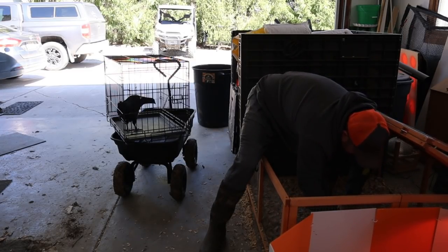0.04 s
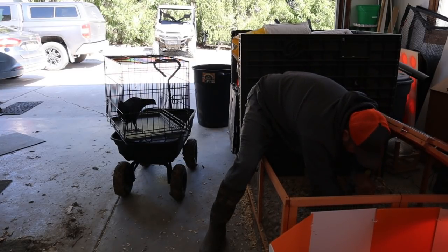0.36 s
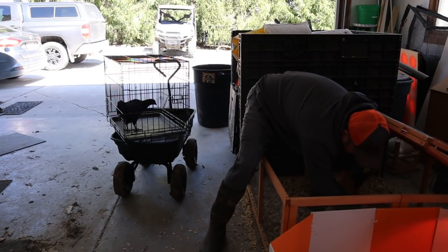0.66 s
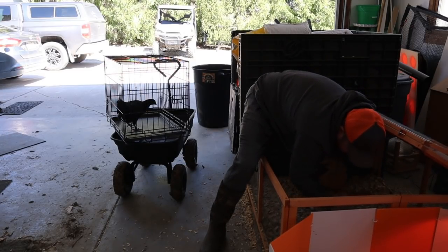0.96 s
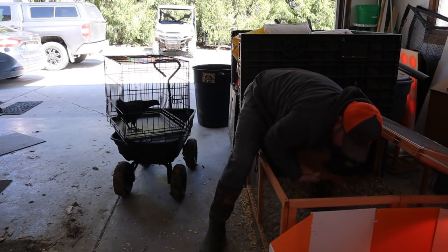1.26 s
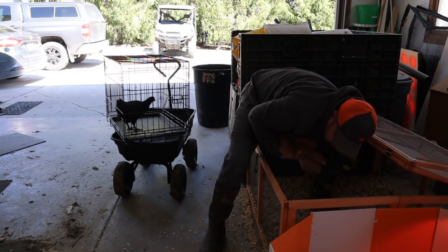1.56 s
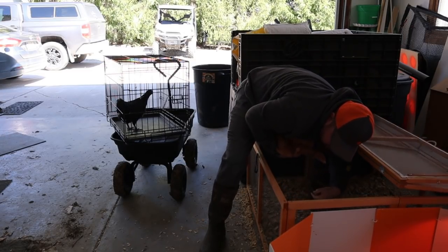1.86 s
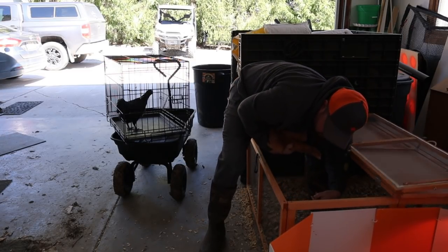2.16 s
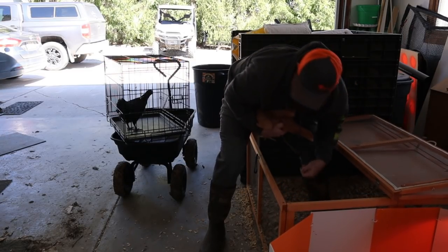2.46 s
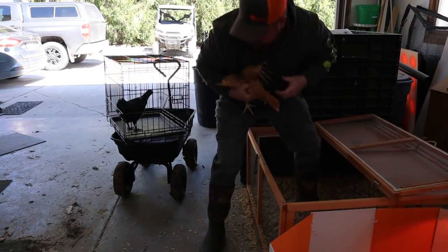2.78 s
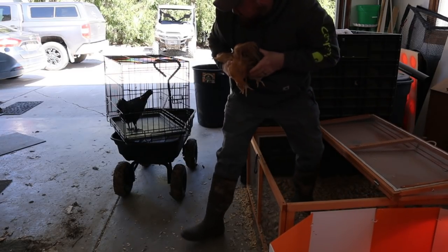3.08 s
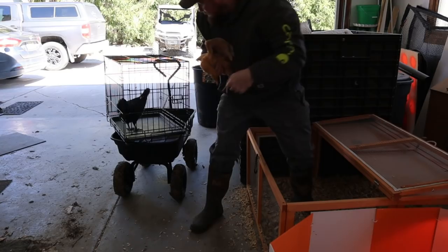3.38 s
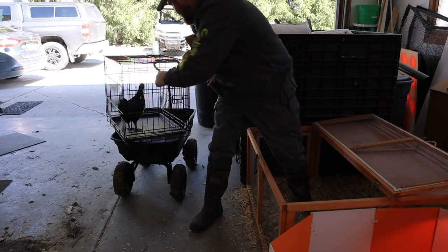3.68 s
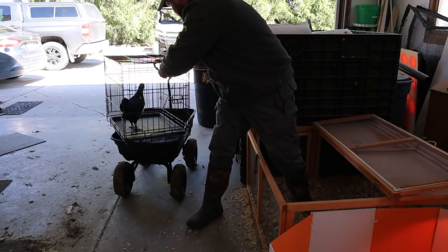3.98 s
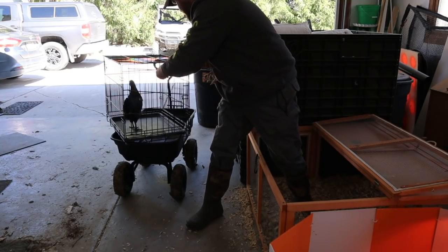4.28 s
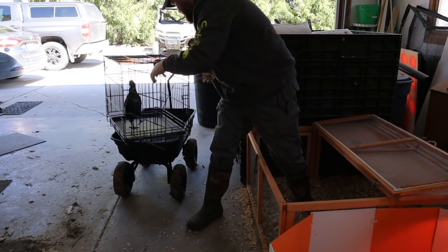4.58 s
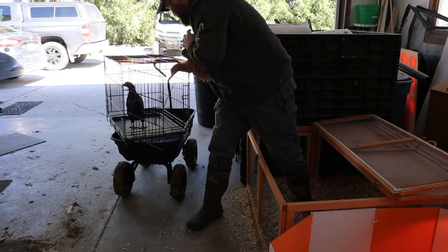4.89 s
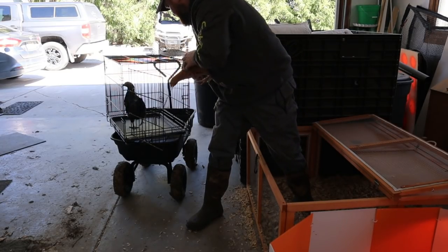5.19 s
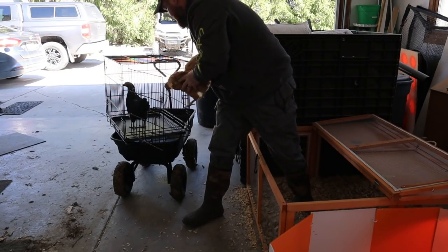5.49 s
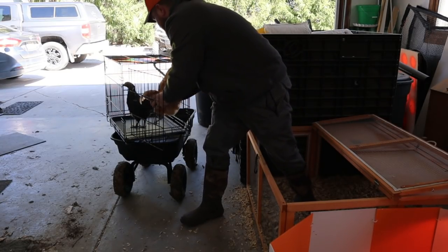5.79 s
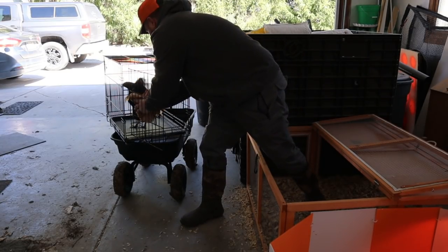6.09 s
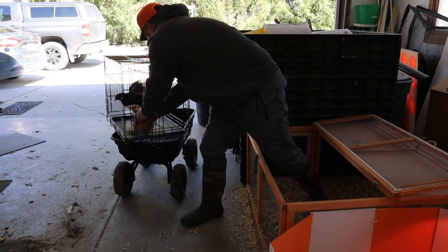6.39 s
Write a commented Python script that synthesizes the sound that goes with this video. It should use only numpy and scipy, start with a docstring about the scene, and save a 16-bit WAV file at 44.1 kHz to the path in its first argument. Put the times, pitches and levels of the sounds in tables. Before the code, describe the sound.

A young chicken squawks from the start, in a quick run of short calls that crack between a thin high note, a fuller note an octave lower and a rasp. Boots scuff around 2 seconds, and at about 2.3 seconds a wooden hutch lid falls open with a thump and a brief rattle. More squawks, some opening on a squeak, follow from 2.6 to 3.7 seconds, with rustling clothes and straw and a couple of dull boot bumps. Cage wires tick lightly between 3.3 and 4.6 seconds, and another chick peeps faintly twice just after 4 seconds while the squawking pauses. The squawks return from 4.7 seconds to the end, with a short rustle near 5.3 seconds, then a scuff and two hoarse clucks just after 6 seconds. Everything has a short garage echo, over a faint, steady outdoor hush.

```python
"""A young chicken squawks again and again as it is lifted from a wooden hutch and put in a wire cage.
Its voice flips between a thin high note, a full note an octave lower (its voice box beats strong and
weak in turn) and a rasp (the beats lose their order). Other chicks peep and cluck.
The hutch lid falls open with a thump, boots scuff, clothes and bedding rustle and cage wires tick.
It all echoes in a garage whose door stands open to the hush of the yard."""
import sys
import numpy as np
from scipy import signal
from scipy.fft import rfft, irfft, next_fast_len
from scipy.io import wavfile

SR = 44100
rng = np.random.default_rng(int(sys.argv[2]) if len(sys.argv) > 2 else 0)


def log_audio(samples):
    """Write samples as a 16-bit WAV file to the path given in sys.argv[1]."""
    # one column per channel
    frames = np.atleast_2d(samples).T
    # limit to full scale, then quantise
    limited = np.clip(frames, -1, 1)
    pcm = np.round(limited * 32767).astype(np.int16)
    wavfile.write(sys.argv[1], SR, pcm)


N = 284445
TIME = np.arange(N) / SR


def amp(db):
    """Turns decibels into a number to multiply by."""
    return 10 ** (np.asarray(db) / 20)


def unit(x):
    """Scales a sound to an average (rms) size of 1."""
    return x / np.sqrt(np.mean(x ** 2) + 1e-20)


def read(points, hz):
    """Looks up a table's value at hz, with octaves evenly spaced."""
    freq_hz, value = np.transpose(points)
    return np.interp(np.log(hz + 1), np.log(freq_hz + 1), value)


def colour(x, spectrum):
    """Turns frequencies up or down by a table of freq_hz, level_db."""
    return irfft(rfft(x) * amp(read(spectrum, np.fft.rfftfreq(len(x), 1 / SR))), len(x))


def noise(spectrum):
    """Noise of size 1 with the given tone colour."""
    return unit(colour(rng.standard_normal(next_fast_len(N, True)), spectrum)[:N])


def wander(hz):
    """A smooth random wobble of size 1, mostly slower than hz."""
    return unit(signal.sosfilt(signal.butter(2, hz, fs=SR, output="sos"), rng.standard_normal(N)))


def treble(x, hz):
    """The part of x above hz."""
    return signal.sosfiltfilt(signal.butter(2, hz, "high", fs=SR, output="sos"), x)


def gate(t, length, attack, release):
    """Fades in, holds and fades out between t = 0 and length."""
    return np.sin(np.pi / 2 * np.clip(np.minimum(t / attack, (length - t) / release), 0, 1)) ** 2


def add(mix, start_s, sound):
    """Mixes a sound in at start_s."""
    part = mix[max(round(start_s * SR), 0):][:len(sound)]
    part += sound[:len(part)]


# Tone colour of the outdoor hush: freq_hz, level_db
YARD_COLOUR = [(21, -28), (35, -0.5), (97, 2), (826, 0), (1770, -8.5), (2290, -11.5), (4330, -28),
               (5450, -18.5), (11700, -38), (15500, -37)]
def yard(level_db=-54):
    """A steady low hush comes in through the open door."""
    return amp(level_db) * noise(YARD_COLOUR)


# How long the echo takes to fade by 60 dB: freq_hz, fade_s
ECHO_FADE = [(150, .7), (500, .57), (1400, .42), (3000, .45), (6000, .4), (14000, .28)]
def garage(x, echo_db, build_s=0.00078):
    """Adds dense echoes from hard walls and floor; the low ones last longest."""
    t = np.arange(SR) / SR
    echoes = rng.choice([-1., 1.], SR) * (rng.random(SR) < 4000 / SR) * (1 - np.exp(-t / build_s))
    hz, when, bands = signal.stft(echoes, SR, nperseg=256)
    tail = signal.istft(bands * amp(-60 * when / read(ECHO_FADE, hz)[:, None]), SR, nperseg=256)[1]
    return x + amp(echo_db) * signal.fftconvolve(x, tail / np.linalg.norm(tail))[:N]


# How loud the rubbing is as time passes: time_s, level_db
RUSTLE_LEVELS = [(0, -61), (2.1, -61.5), (2.65, -55.5), (2.95, -48.5), (3.2, -54), (3.34, -51),
                 (3.42, -64.5), (3.8, -65), (3.89, -53.5), (4.1, -65.5), (4.27, -58.5), (4.6, -68),
                 (5.15, -67), (5.35, -46), (5.55, -74)]
# Tone colour of the rubbing: freq_hz, level_db
CLOTH_COLOUR = [(300, -2), (1500, 7.5), (3500, 8.5), (7000, -2.5), (12000, -6), (15500, -12)]
def rustle(grain_db=2.5):
    """Cloth and straw rub in clumps of tiny slips."""
    level_db = np.interp(TIME, *np.transpose(RUSTLE_LEVELS))
    return amp(level_db) * unit(noise(CLOTH_COLOUR) * amp(grain_db * wander(150)))


# Scuffs of boots: start_s, level_db, decay_s
BOOT_SCUFFS = [(1.97, -35, 0.083), (2.261, -29.5, 0.044), (2.296, -31, 0.029), (3.062, -28, 0.01),
               (3.304, -30, 0.007), (6.215, -36, 0.12), (6.35, -63, 0.036)]
# Tone colour of a scuff: freq_hz, level_db
BOOT_COLOUR = [(60, -15), (140, -9), (250, -0.5), (650, -4), (1100, -7), (3000, -19.5), (12000, -50)]
def scuffs():
    """Boots bump and drag: dull bursts, and the longer ones start more softly."""
    force, t = np.zeros(N), np.arange(SR // 3) / SR
    for start_s, db, decay_s in BOOT_SCUFFS:
        add(force, start_s, amp(db) * np.exp(-t / decay_s) * np.minimum(t / (0.22 * decay_s), 1))
    return force * noise(BOOT_COLOUR)


# Ticks of the cage: start_s, strength_db
CAGE_TICKS = [(3.304, -49), (3.335, -33), (3.74, -43.5), (3.974, -36.5), (4.233, -39), (4.428, -39),
              (4.603, -43)]
# Notes a wire rings with, and their time to fade by 60 dB: pitch_hz, level_db, fade_s
WIRE_NOTES = [(2450, -12, 0.056), (3930, 1.5, 0.028), (5980, 0, 0.03), (7960, -17, 0.021),
              (12640, -14, 0.027)]
def cage(level_db=-8, detune=0.064):
    """Thin wires click and ring briefly, at slightly different pitches each time."""
    out, t = np.zeros(N), np.arange(SR // 8) / SR
    for start_s, strength_db in CAGE_TICKS:
        ring = np.zeros(len(t))
        for hz, db, fade_s in WIRE_NOTES:
            pitch_hz = hz * (1 + detune * rng.standard_normal())
            ring += amp(db - 60 * t / fade_s) * np.sin(2 * np.pi * pitch_hz * t)
        click = np.exp(-t / 0.00051) * rng.standard_normal(len(t))
        add(out, start_s, amp(strength_db + level_db) * (0.34 * ring + 1.26 * click))
    return out


# Blows on the hutch: start_s, strength_db, rattle_decay_s, treble_db
HUTCH_KNOCKS = [(2.325, -17, 0.018, -9), (2.351, -17, 0.0043, -5.5), (2.385, -34, 0.041, -3),
                (2.426, -30, 0.018, -15), (2.491, -28, 0.019, -1.5), (2.535, -36.5, 0.055, -7)]
# Notes the wooden frame rings with: pitch_hz, width_hz, level_db
WOOD_NOTES = [(164.5, 7.2, 20.7), (340.8, 39, 8.6), (373, 31.4, 9), (523, 9.4, 7.7), (582.4, 88, 13),
              (636, 83, 6.5), (940, 35, 2), (1196, 48, 17.6)]
# Tone colour of the crack of a blow: freq_hz, level_db
CRACK_COLOUR = [(70, -27), (115, -50), (165, -5), (400, -4.5), (1200, -1), (2500, -8.5), (5500, -19),
                (7500, -30), (15000, -54)]
def hutch(crack_db=-2, ring_db=-3, push=0.23, push_s=0.0027):
    """Each blow is a push and a short rattle of loose boards that rings the wooden frame."""
    force, bright = np.zeros((2, N))
    t = np.arange(SR // 3) / SR
    for start_s, db, decay_s, treble_db in HUTCH_KNOCKS:
        rattle = amp(db) * np.exp(-t / decay_s) * rng.standard_normal(len(t))
        add(force, start_s, rattle + amp(db) * push * gate(t, push_s, push_s / 2, push_s / 2))
        add(bright, start_s, rattle * amp(treble_db))
    ring = sum(amp(db) * signal.lfilter(*signal.iirpeak(hz, hz / width_hz, fs=SR), force)
               for hz, width_hz, db in WOOD_NOTES)
    ring -= treble(ring, 2100)  # soft wood has no high ring
    crack = colour(force + treble(bright - force, 890), CRACK_COLOUR)
    return np.std(force) * (amp(ring_db) * unit(ring) + amp(crack_db) * unit(crack))


def whistle(rows, overtone_db, jitter, rise, fall):
    """Unsteady sliding notes with weak overtones; rise and fall are shares of a note's length."""
    out, unsteady = np.zeros(N), 1 + jitter * wander(460)
    for start_s, length_s, from_hz, to_hz, db in rows:
        on = (TIME >= start_s) & (TIME < start_s + length_s)
        progress = (TIME[on] - start_s) / length_s
        phase = 2 * np.pi * np.cumsum((from_hz + (to_hz - from_hz) * progress) * unsteady[on]) / SR
        note = unit(sum(amp(overtone_db * k) * np.sin((k + 1) * phase) for k in range(3)))
        out[on] += amp(db) * gate(progress, 0.96, rise, fall) * note
    return out


# Peeps: start_s, length_s, from_hz, to_hz, level_db
CHICK_PEEPS = [(2.56, .056, 2188, 2020, -35.5), (4.108, 0.077, 2490, 2006, -49),
               (4.298, .1, 3170, 1960, -46)]
def peeps():
    """A chick farther off gives high, nearly pure, falling notes."""
    return whistle(CHICK_PEEPS, overtone_db=-29, jitter=0.013, rise=0.43, fall=0.24)


# Clucks: start_s, length_s, from_hz, to_hz, level_db
CHICK_CLUCKS = [(3.05, .026, 1302, 607.5, -36.5), (6.21, 0.0424, 920.5, 820, -26.5),
                (6.352, 0.0377, 852, 722, -29.5)]
def clucks():
    """Short, low, hollow notes, made hoarse by a shaky pitch and loudness."""
    notes = whistle(CHICK_CLUCKS, overtone_db=-10.5, jitter=0.118, rise=0.19, fall=0.23)
    return notes * (1 + 0.35 * wander(339))


# How the hutch colours the voice inside it: freq_hz, level_db
HUTCH_COLOUR = [(300, -2.5), (620, 1.5), (1200, -2), (2000, 2), (2700, 6.5), (3600, 2), (5500, 1.5),
                (9000, -1), (15000, 0.5)]
def lifted(voice, clear_s=3.18, lift_s=.5):
    """The hutch colours the voice until the bird is lifted clear."""
    inside = np.clip((clear_s - TIME) / lift_s, 0, 1)
    return colour(voice * inside, HUTCH_COLOUR) + voice * (1 - inside)


def carried(voice, echo_db, cycle_s=1.96):
    """The bird is moved about, so its voice drifts between three patterns of echoes."""
    place = 2 * np.pi * TIME / cycle_s
    return sum(garage(voice * (1 + np.cos(place + 2 * np.pi * k / 3)) / 3, echo_db) for k in range(3))


# Squeaks of the held bird: start_s, from_hz, to_hz, level_db
OPENING_SQUEAKS = [(2.186, 2704, 2450, -51.5), (2.604, 3000, 2635, -46), (2.931, 2265, 2955, -41),
                   (3.195, 2721, 2218, -38.5), (3.616, 2968, 2336, -43), (4.71, 2650, 1700, -43),
                   (6.05, 1397, 2000, -26)]
def squeaks(length_s=0.0202, overtone_db=-19, jitter=0.067):
    """The young voice cracks: some calls start on an unsteady squeak."""
    out, t = np.zeros(N), np.arange(0, length_s, 1 / SR)
    unsteady = 1 + jitter * wander(400)
    for start_s, from_hz, to_hz, db in OPENING_SQUEAKS:
        hz = np.geomspace(from_hz, to_hz, len(t)) * unsteady[TIME >= start_s][:len(t)]
        phase = 2 * np.pi * np.cumsum(hz) / SR
        note = np.sin(phase) + amp(overtone_db) * np.sin(2 * phase)
        add(out, start_s, amp(db) * note * signal.windows.tukey(len(t), .5))
    return out


# Calls of the held bird on its high note; a share runs from 0 to 1, and an open beak adds treble:
# start_s, length_s, effort_db, swell_db, pitch_hz, glide_hz, rasp_share, beak_treble_db
HIGH_CALLS = [(-.015, 0.061, -34, -4, 1400, -24.5, 0.66, -2.5), (.069, 0.078, -33, -2, 1403, -39, 0.67, -7),
              (.287, .176, -32, -1, 1387, -49, 0.86, 1), (.519, 0.067, -31, -1, 1444, 44, 0.38, 3.5),
              (.612, .045, -30, 3, 1473, -14, 0.24, -32), (.717, 0.1, -27, 3.5, 1429, 37.5, 0.09, -2.5),
              (.955, 0.16, -27, -1.5, 1385, 15.5, 0.42, -4.5),
              (1.25, .195, -30, -0.5, 1372, -150, 0.61, -2), (1.53, .13, -31, -6.5, 1318, -0.5, .25, 0.5),
              (1.795, 0.1, -29.5, -0.5, 1297, -20, 0.38, -1), (2.195, 0.067, -37, 2.5, 1457, -19, 0.83, -3),
              (2.602, .213, -30, 8, 1325, -70, 0.25, -2.5), (2.939, 0.12, -29.5, -1, 1330, -83, 0.73, 0),
              (3.201, 0.061, -29.5, -4, 1471, -260, .8, -2.5),
              (3.25, 0.052, -31, 5, 1371, -320, 0.69, -1.5), (3.624, .074, -29, 0, 1451, -330, 0.64, -2.5),
              (4.717, .085, -30.5, 2, 1376, -130, 0.84, -3.5), (4.79, .16, -32, 4, 1329, -17, 0.66, -4),
              (5.203, 0.26, -27, -0.5, 1335, -110, 0.39, -6.5),
              (5.516, 0.13, -29.5, -2, 1353, -11, 0.74, 0.5), (5.773, 0.095, -29, 2.5, 1326, -100, 0.6, -6),
              (6.028, .18, -33, 1, 1408, -150, 0.61, -7), (6.32, 0.098, -32, -3.5, 1342, -39.5, .5, -2)]
def high_calls(fade_s=0.017, scoop=.11, scoop_s=.01, catch_s=.012, clearing=0.57):
    """Curves that steer the voice: each call slides up to pitch; its rasp catches, then eases."""
    hz = np.full(N, np.mean(HIGH_CALLS, axis=0)[4])
    effort, rasp, beak_db = np.zeros((3, N))
    quaver = .03 * wander(39.52)  # the raspier the call, the more this shakes its pitch
    for start_s, length_s, db, swell_db, pitch_hz, glide_hz, rough, treble_db in HIGH_CALLS:
        on = (TIME >= start_s) & (TIME < start_s + length_s)
        t = TIME[on] - start_s
        from_middle = t / length_s - .5
        effort[on] += amp(db + swell_db * from_middle) * gate(t, length_s, fade_s, fade_s)
        slide_up = 1 - scoop * np.exp(-t / scoop_s)
        hz[on] = (pitch_hz + glide_hz * from_middle) * slide_up * (1 + rough * quaver[on])
        rasp[on] = rough * (1 - clearing * from_middle) * (1 - np.exp(-t / catch_s))
        beak_db[on] = treble_db
    return hz, effort, rasp, beak_db


# Breaks, where a call drops to the full note an octave lower: start_s, length_s, pitch_hz,
# arch_hz, glide_hz, low_note_share, rasp_share, extra_effort_db, beak_treble_db
VOICE_BREAKS = [(.305, .07, 581.5, 9, -10, 0.85, 0.19, 4.5, 3.5),
                (.732, .035, 687, 0, 4, 0.74, 0.62, 0, -2.5),
                (.973, 0.12, 637.4, 20, -17, 0.89, 0.15, -2.5, 6.5),
                (1.277, .132, 617, -35.5, 50.5, 0.93, .24, -1.5, 6.5),
                (1.564, 0.043, 637, 1.5, -14, 0.8, 0.86, 0, 2.5),
                (1.833, 0.044, 651, 1.5, -2, 0.81, 0.79, 0, -3.5),
                (2.679, 0.032, 661.6, 0, -2, 0.47, 0.42, -3, 2.5),
                (2.95, 0.097, 584.2, 10.5, -51, 0.71, 0.62, 3, -7),
                (4.871, 0.028, 654.6, 1, 3, .5, 0.7, 3.5, -5),
                (5.228, .042, 622.7, -0.5, 7, 0.64, .8, -1.5, -3.5),
                (5.336, 0.11, 586.6, 23.5, 27, 0.71, .24, -1.5, 3.5),
                (5.533, 0.078, 626.6, 98, -3, 0.76, 0.27, 0, 6.5),
                (5.793, .04, 599, 1, -2, 0.69, 0.6, -1.5, 2.5),
                (6.069, 0.15, 628.6, 8.5, -20, 0.68, 0.6, 0.5, 2)]
def voice_breaks(hz, effort, rasp, beak_db, flip_s=.008, stumble_s=0.0097, beak_db_per_hz=0.1366):
    """Bends the curves at each break: the low note comes in and the beak opens as its pitch rises."""
    in_break, low_note = np.zeros((2, N))
    for start_s, length_s, pitch_hz, arch_hz, glide_hz, depth, rough, push_db, treble_db in VOICE_BREAKS:
        on = (TIME >= start_s) & (TIME < start_s + length_s)
        t = TIME[on] - start_s
        blend = gate(t, length_s, flip_s, flip_s)
        note_hz = pitch_hz + arch_hz * np.sin(np.pi * t / length_s) + glide_hz * (t / length_s - .5)
        in_break[on], low_note[on] = blend, blend * depth
        hz[on] += blend * (2 * note_hz - hz[on])  # two beats make one cycle of the low note
        rasp[on] += blend * (rough - rasp[on])
        beak_db[on] += blend * (treble_db + beak_db_per_hz * (note_hz - note_hz.mean()) - beak_db[on])
        effort[on] *= amp(blend * push_db)
        # the voice rasps going into a break and coming out of it
        for edge_s, amount in (start_s, 0.37), (start_s + length_s, 0.63):
            rasp += amount * (1 - rasp) * np.exp(-((TIME - edge_s) / stumble_s) ** 2)
    low_note += (1 - in_break) * 0.51 * rasp  # a rasp lets some low note into the high one
    return hz, effort, rasp, beak_db, low_note


# Tone colour of the throat on a clear note: freq_hz, level_db
THROAT_COLOUR = [(350, -17), (620, 10), (900, -0.5), (1350, 8.5), (1800, 11), (2300, -6.5), (2750, -8),
                 (3500, -3), (4400, -14), (5600, -20), (7000, -29.5), (9000, -30), (11000, -32),
                 (15500, -63)]
# Tone colour of the throat on a rasp: freq_hz, level_db
RASP_COLOUR = [(200, -16.5), (400, -14.5), (600, -9), (900, -19), (1350, 2), (1900, 7), (2500, 0.5),
               (3200, -9.5), (5400, -11), (7000, -24.5), (9000, -23.5), (15500, -39.5)]
def squawks(jitter=0.02, waver=0.0152, shimmer=0.27, slip_hz=170, stumble_hz=135, beak_hz=2600):
    """The voice box beats at the high pitch; uneven beats drop it an octave; pushed on, it rasps."""
    hz, effort, rasp, beak_db, low_note = voice_breaks(*high_calls())
    on = effort > 0
    low_note, rasp = np.clip(low_note[on], 0, 1), np.clip(rasp, 0, .9)
    brightness = amp(beak_db + 3) * np.sqrt(np.minimum(effort / amp(-25.5), 1))  # duller when quiet
    unsteady = 1 + jitter * rasp * wander(340) + waver * np.sqrt(rasp) * wander(73.5)
    cycles = np.cumsum(hz / 2 * unsteady) / SR
    # in a rasp the strong and weak beats lose their order, blurring the low note; the high one stumbles
    slip = np.cumsum(slip_hz * rasp ** 2 * wander(505)) / SR
    stumble = np.cumsum(stumble_hz * rasp ** 1.503 * wander(353)) / SR
    tone, power = np.zeros((2, N))
    for k in range(1, 26):  # even harmonics make the high note, odd ones add the low note
        harmonic_hz = k * hz[on] / 2
        share = low_note ** 3.6 if k == 1 else low_note if k % 2 else 1
        size = amp(read(THROAT_COLOUR, harmonic_hz)) * share
        size *= amp(2.5 * wander(27)[on])  # a struggling neck keeps shifting the tone colour
        beak_effect = 1 / (1 + (beak_hz / harmonic_hz) ** 8)
        lag = k ** 2 / 20  # the throat rings, which spreads each pulse over its cycle
        phase = 2 * np.pi * (k * cycles[on] + k % 2 * slip[on] + stumble[on] - lag)
        tone[on] += size * (1 + beak_effect * (brightness[on] - 1)) * np.cos(phase)
        power[on] += (size * (1 - beak_effect)) ** 2 / 2
    tone /= np.sqrt(power + 1e-9)
    airflow = 1 + 0.37 * np.cos(2 * np.pi * 2 * cycles)  # air escapes in one puff a beat
    puffs = unit(colour(rng.standard_normal(N) * airflow, RASP_COLOUR))
    puffs += (brightness - 1) * treble(puffs, beak_hz)
    flutter = np.exp(shimmer * rasp * wander(186))
    return effort * flutter * (np.sqrt(1 - rasp ** 2) * tone + amp(-1) * rasp * puffs)


def scene():
    """Birds and handling noises in the garage, over the hush of the yard."""
    held_bird = amp(2.5) * carried(lifted(squawks() + squeaks()), echo_db=-1.5)
    other_chicks = clucks() + peeps()
    handling = garage(hutch(), echo_db=-2)
    handling += garage(cage() + rustle(), echo_db=-7.5)
    handling += garage(scuffs(), echo_db=-6)
    return (held_bird + garage(other_chicks, echo_db=-5.5) + handling + yard())[None]


def record(dry, lowest_hz=42, highest_hz=15780):
    """The microphone loses the deepest bass and the recorder cuts the highest treble."""
    thin = signal.sosfilt(signal.butter(2, lowest_hz, "high", fs=SR, output="sos"), dry)
    treble_cut = signal.firwin(801, highest_hz, window=("kaiser", 9), fs=SR)
    return signal.oaconvolve(thin, treble_cut[None], "same")


dry = scene()
out = record(dry)
log_audio(out)
```